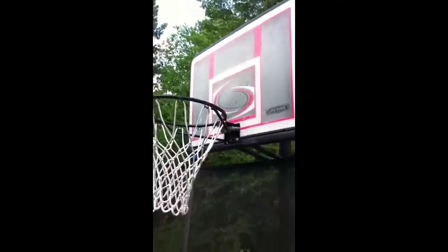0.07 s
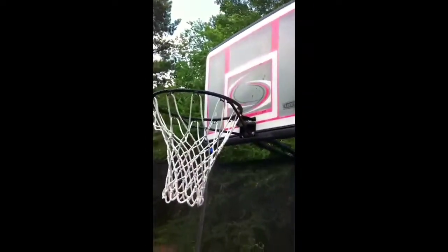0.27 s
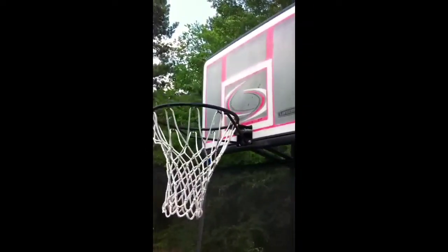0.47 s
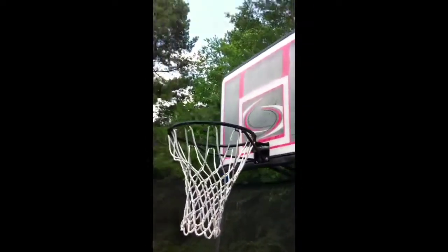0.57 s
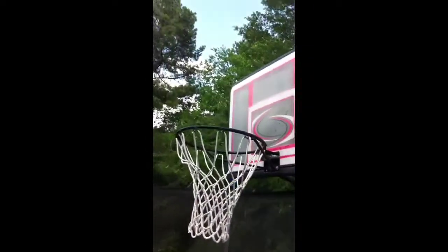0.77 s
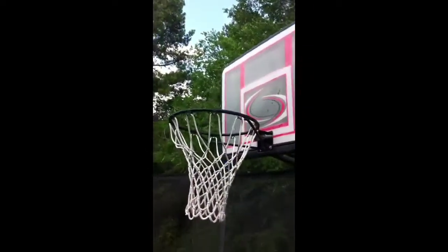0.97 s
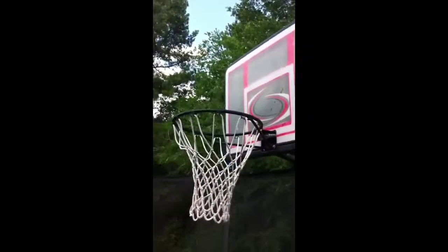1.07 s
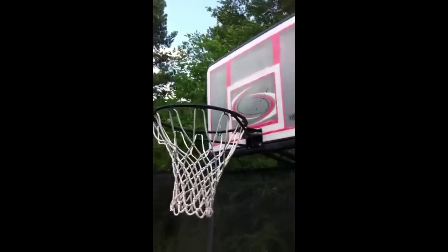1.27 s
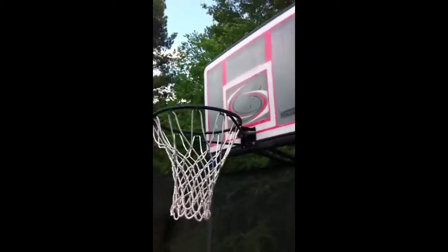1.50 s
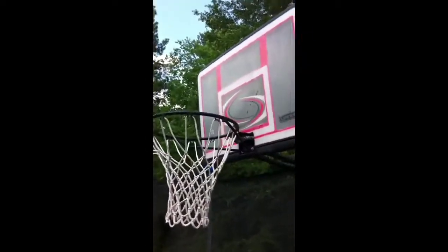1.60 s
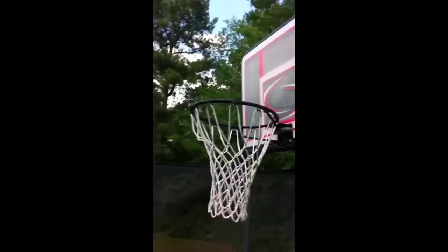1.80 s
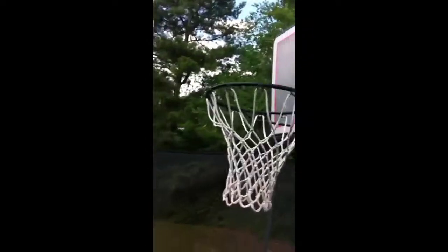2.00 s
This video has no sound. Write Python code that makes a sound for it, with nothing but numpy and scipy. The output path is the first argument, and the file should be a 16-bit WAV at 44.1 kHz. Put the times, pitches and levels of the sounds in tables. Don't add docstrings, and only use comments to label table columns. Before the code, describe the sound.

A trampoline takes two bounces: soft thuds, a loud rushing of stretching mat, spring squeaks and bright metal tinks; the second is shorter, then dull padding knocks. Quiet backyard, close mono phone microphone.

```python
import sys
import numpy as np
from scipy import signal
from scipy.io import wavfile

SR = 44100
rng = np.random.default_rng(int(sys.argv[2]) if len(sys.argv) > 2 else 0)


def log_audio(samples):
    frames = np.atleast_2d(samples).T
    limited = np.clip(frames, -1, 1)
    pcm = np.round(limited * 32767).astype(np.int16)
    wavfile.write(sys.argv[1], SR, pcm)


def nominal_scale(level):
    x = np.asarray(level, float) / 20
    return 10 ** x


N = 90404


def rms_one(x):
    return x / np.sqrt(np.mean(x ** 2) + 1e-20)


def drift(rate_hz):
    r = np.exp(-2 * np.pi * rate_hz / SR)
    settle = 9000
    wander = signal.lfilter([1], [1, -2 * r, r * r], rng.standard_normal(N + settle))
    return rms_one(wander[settle:])


def resonance(x, hz, width_hz):
    r = np.exp(-np.pi * width_hz / SR)
    feedback = [1, -2 * r * np.cos(2 * np.pi * hz / SR), r * r]
    return signal.lfilter(np.array([1, 0, -1]) * (1 - r * r) / 2, feedback, x)


def ring(start_s, peak_db, hz, t60_s, rise_s):
    t = np.maximum(np.arange(N) / SR - start_s, 0)
    decay = nominal_scale(peak_db - 60 * np.minimum(t / t60_s, 3))
    rise = -np.expm1(-t / rise_s)
    return decay * rise * np.sin(2 * np.pi * hz * t) * (t < 3 * t60_s)


def swell(start_s, length_s):
    return np.sin(np.pi * np.clip((np.arange(N) / SR - start_s) / length_s, 0, 1))


def bands(sources, spectrum, tilt_db, flicker_db):
    hz, level_db = np.transpose(spectrum)
    edges_hz = 40 * 2 ** np.arange(0, 8.8, 1 / 3)
    out = 0
    for k, (low, high) in enumerate(zip(edges_hz, edges_hz[1:])):
        mid = np.sqrt(low * high)
        db = np.interp(np.log(mid), np.log(hz), level_db, left=level_db[0] - 12)
        sos = signal.butter(2, [low, high], "band", fs=SR, output="sos")
        band = signal.sosfilt(sos, sources[k % 2])
        out = out + nominal_scale(db + tilt_db * np.log2(mid / 3500) + flicker_db * drift(8.8)) * band
    return out


def garden():
    # frequency in Hz, level in dB per Hz.
    garden_colour = [(24, -55), (40, -3), (124, -11), (199, -1.5), (663, -8.5), (852, -4.5), (1340, -17),
                     (1550, -15), (16000, -32)]
    floor = bands(rng.standard_normal((2, N)), garden_colour, 0, flicker_db=1.2)
    return nominal_scale(-55) * rms_one(floor)


def humming_spring():
    # time in seconds, level in dB.
    hum_level = [(0, -77), (.1, -75), (.75, -64.5), (.9, -66), (1.0, -70), (1.05, -80), (1.6, -69),
                 (1.75, -69), (1.9, -71), (2.05, -78)]
    hum_hz, width_hz, steady_share = 2885, 70, 1.3
    waver_hz, throb_db = 20, 2.5
    narrow = resonance(rng.standard_normal(N), hum_hz, width_hz)
    narrow = rms_one(resonance(narrow, hum_hz, width_hz))
    phase = 2 * np.pi * np.cumsum(hum_hz + waver_hz * drift(8)) / SR
    tone = np.sin(phase) * nominal_scale(throb_db * drift(18))
    envelope_db = np.interp(np.arange(N) / SR, *np.transpose(hum_level))
    return nominal_scale(envelope_db) * (narrow + steady_share * tone)


def tinks():
    # start in seconds, level in dB.
    touches = [
        (.0001, -49),
        (.59, -50),
        (.599, -38),
        (.708, -44),
        (.9505, -50),
        (.9545, -46),
        (.987, -62),
        (1.571, -45),
    ]
    # frequency in Hz, level in dB, t60 in seconds.
    hook_modes = [(8150, -5, .045), (12750, -9, .04), (13150, 0, .075), (15050, -3, .05), (15250, -5, .02)]
    luck_db = rng.normal(0, 1.5, (len(touches), len(hook_modes)))
    out = 0
    for i, (start, db) in enumerate(touches):
        for k, (hz, gain_db, t60) in enumerate(hook_modes):
            out = out + ring(start, db + gain_db + luck_db[i, k], hz, t60, rise_s=.001)
    return out


def effort():
    # time in seconds, rush level in dB, brightness in dB per octave.
    first_bounce = [
        [(0.02, -80, -12), (0.032, -55.5, -5), (0.058, -62, 6), (0.08, -74, -6), (0.114, -59.5, -8.5),
         (0.154, -49.5, -6), (0.2, -58, -7)],
        [(0.205, -45, -2), (0.225, -29.5, 1.5), (0.245, -24.5, 1.3), (0.27, -20.5, 1.1), (0.3, -22.5, 2),
         (0.319, -24.5, 3), (0.37, -42, 3)],
        [(0.375, -39.5, 3), (0.407, -29.5, 2.2), (0.471, -24, 2), (0.57, -39, -0.2)],
        [(0.59, -38, 0), (0.624, -45.5, -4), (0.682, -36, 0.5), (0.712, -43, 4), (0.717, -55, -5),
         (0.725, -47, -8), (0.732, -34, -0.5), (0.798, -54.5, 0.5), (0.95, -73, -7)],
    ]
    second_bounce = [
        [(1.115, -109, -12), (1.129, -42.5, -3), (1.153, -28.5, 1.7), (1.195, -30, -0.3), (1.213, -23.5, 0.8),
         (1.261, -25, 1.4), (1.29, -30.5, 1.5), (1.31, -40.5, 4.5), (1.34, -47.5, 2.2)],
        [(1.345, -45.5, 4), (1.401, -37, -0.8), (1.497, -30, 0), (1.56, -46, -0.5)],
        [(1.57, -41.5, 1.8), (1.624, -44, 0), (1.636, -40.5, 3), (1.714, -63.5, -0.5), (1.776, -54.5, -2.5),
         (1.864, -73, -11), (1.872, -56, -10), (1.9, -83, 7)],
    ]
    # start in seconds, peak in dB, t60 in seconds, brightness in dB per octave.
    scuffs = [(.152, -44.5, 0.19, 6.5), (0.57, -29.5, 0.14, -0.5), (0.633, -39.5, 0.11, 10),
              (.655, -39, .1, 1), (.675, -33, 0.059, -0.5), (0.696, -36, 0.073, -3),
              (0.729, -29, 0.097, 1.5), (.951, -60, 0.069, 6), (1.596, -38.5, 0.072, 9.5),
              (1.632, -33, 0.073, -1), (1.77, -51, 0.051, 6), (1.798, -47.5, 0.068, 1),
              (1.8709, -62, 0.03, 9), (1.885, -73, 0.27, 17), (1.903, -70, .04, 13),
              (1.9383, -66, 0.05, 16), (1.178, -22, .03, -2), (1.203, -28, 0.033, -1),
              (0.502, -25.5, 0.065, 5), (1.386, -38, 0.051, 4), (1.45, -32, 0.13, -1), (.395, -36, .08, 14)]
    scuff_rise_s = .004
    t = np.arange(N) / SR
    s, db, bright = np.transpose(sum(first_bounce + second_bounce, []))
    power = nominal_scale(2 * np.interp(t, s, db, left=-120))
    tilt = np.interp(t, s, np.clip(bright, -6, 6))
    for start, peak_db, t60, colour in scuffs:
        u = np.maximum(t - start, 0)
        decay = nominal_scale(peak_db - 60 * np.minimum(u / t60, 3))
        more = (decay * np.minimum(u / scuff_rise_s, 1)) ** 2
        tilt = (tilt * power + colour * more) / (power + more)
        power = power + more
    return np.sqrt(power), tilt


def fibres():
    per_s, spread_db, tick_share = 14000, 3.5, 0.25
    sizes = nominal_scale(spread_db * np.minimum(rng.exponential(1, N), 5)) * rng.choice([-1, 1], N)
    ticks = rms_one(sizes * (rng.random(N) < per_s / SR))
    return np.sqrt(tick_share) * ticks + np.sqrt(1 - tick_share) * rng.standard_normal(N)


def rush():
    # frequency in Hz, level in dB per Hz.
    rush_colour = [(180, -45), (300, -13), (385, -9), (520, -11), (689, -8.5), (3460, 2), (10200, -31.5),
                   (12300, -36), (16000, -64.5)]
    # frequency in Hz, width in Hz, level in dB.
    weave = [(753, 9.9, -24), (1446, 183, -6), (2450, 160, -8), (3110, 150, -14), (3336, 104, -7.5),
             (4630, 600, -53), (4820, 530, -7), (5800, 950, -4), (11300, 6300, -11.5)]
    coils = [(2150, 40, -22), (2490, 25, -22), (2700, 20, -22), (3050, 35, -21), (3325, 20, -20),
             (3560, 35, -19), (4166, 25, -19), (4300, 20, -22), (4650, 60, -20), (5140, 20, -20),
             (5530, 25, -20), (5880, 45, -22), (6157, 20, -23), (7295, 30, -25)]
    level, tilt = effort()
    threads = [fibres(), fibres()]
    body = bands(threads, rush_colour, tilt, flicker_db=1.0)
    body = body / np.std(bands(threads, rush_colour, 0, 0))
    peaks = 0
    for k, (hz, width_hz, db) in enumerate(weave + coils):
        peak = rms_one(resonance(threads[k % 2], hz, width_hz))
        sway_db = 1.8 * drift(8.6)
        peaks = peaks + (-1) ** k * nominal_scale(db + tilt * np.log2(hz / 3500) + sway_db) * peak
    clumps = nominal_scale(1.0 * drift(77))
    return level * clumps * (body + peaks) * nominal_scale(-4.0)


def squeaks():
    # start in seconds, length in seconds, frequency in Hz, level in dB.
    squeak_list = [(.225, .085, 395, -43), (.41, .105, 390, -43.5), (1.121, .026, 1290, -42),
                   (1.145, .03, 1250, -46), (1.384, .024, 1430, -39), (1.384, .024, 1790, -39),
                   (1.225, .04, 700, -44), (1.17, .025, 700, -44), (.105, .05, 2750, -57),
                   (.42, .04, 820, -47), (.225, .05, 990, -41), (.39, .035, 1160, -46),
                   (.43, .05, 2170, -41), (.72, .035, 3270, -43)]
    t = np.arange(N) / SR
    out = 0
    for start, length, hz, db in squeak_list:
        rough = rms_one(resonance(rng.standard_normal(N), hz, width_hz=30))
        tone = np.sin(2 * np.pi * hz * t) + .25 * rough
        out = out + nominal_scale(db) * swell(start, length) * tone
    return out


def thuds():
    # start in seconds, peak in dB, pitch factor.
    footfalls = [(0.1289, -42, 1.08), (0.135, -30.5, 0.96), (.165, -46, 1.1), (0.3, -36, 1.4),
                 (0.31, -46, 1.23), (0.324, -39.5, 0.92), (0.389, -48, 1.94), (1.0807, -32, 1.035),
                 (1.106, -57, 0.68), (1.135, -53, 0.55), (1.237, -48, 0.93), (1.255, -42, 2.2),
                 (1.274, -41, 0.62), (1.301, -41.5, 1.38), (0.211, -41, 2.23), (0.584, -45, 1.7)]
    # frequency in Hz, level in dB, t60 in seconds.
    mat_modes = [(156, 4.5, 0.033), (257, -6, 0.031), (389, -1, 0.045), (660, -1, 0.0099),
                 (920, -12, 0.018), (3700, -12, 0.0088)]
    out = 0
    for start, db, pitch in footfalls:
        for hz, gain_db, t60 in mat_modes:
            out = out + ring(start, db + gain_db, hz * pitch, t60, rise_s=.0008)
    return out


def knocks():
    # start in seconds, peak in dB, frequency in Hz.
    padding_hits = [(1.8735, -29, 430), (1.874, -36, 780), (1.9185, -33, 340), (1.925, -31, 640),
                    (1.9325, -35, 450), (1.933, -40, 900), (1.944, -42, 270), (2.033, -44, 220),
                    (1.081, -36, 700), (.311, -38, 430), (.131, -40, 480)]
    return sum(ring(start, db, hz, 7.5 / hz, rise_s=.001) for start, db, hz in padding_hits)


def puffs():
    # start in seconds, peak in dB, length in seconds.
    puff_list = [
        (.39, -27, 0.034),
        (1.14, -36, 0.034),
    ]
    return sum(nominal_scale(db) * swell(start, length) ** 2 for start, db, length in puff_list)


def yard(x):
    delay_s, t60_s, echo_db = 0.023, 0.24, -24
    t = np.arange(SR // 2) / SR
    tail = rng.standard_normal(len(t)) * nominal_scale(-60 * t / t60_s) * (t > delay_s)
    tail = signal.lfilter([.5], [1, -.5], tail)
    return nominal_scale(echo_db) * signal.fftconvolve(x, tail / np.linalg.norm(tail))[:N]


def scene():
    mat = rush()
    mat = mat - .7 * resonance(mat, 10150, width_hz=300)
    near = mat + tinks() + squeaks() + thuds() + knocks()
    mono = near + yard(near) + garden() + humming_spring() + puffs()
    return np.tile(mono, (2, 1))


def band_limit(x):
    return signal.sosfilt(signal.butter(12, 16470, fs=SR, output="sos"), x)


def record(dry):
    x = signal.sosfilt(signal.butter(4, 105, "high", fs=SR, output="sos"), dry)
    x = x + nominal_scale(-85) * drift(25)
    x = signal.sosfilt(signal.cheby2(24, 70, 16020, fs=SR, output="sos"), x)
    return band_limit(x)


dry = scene()
out = record(dry)
log_audio(out)
```